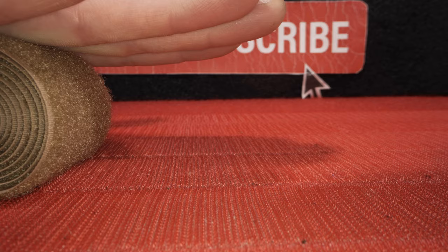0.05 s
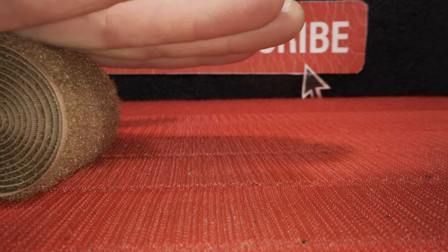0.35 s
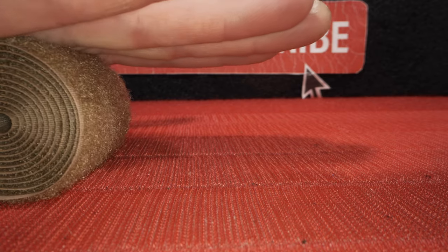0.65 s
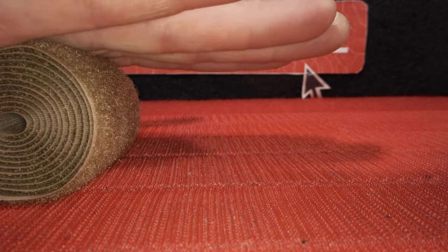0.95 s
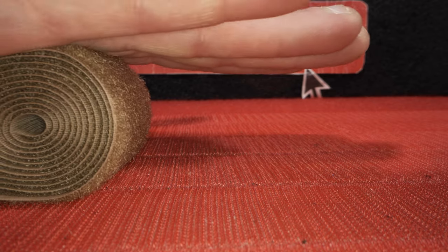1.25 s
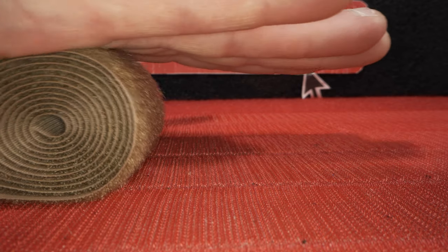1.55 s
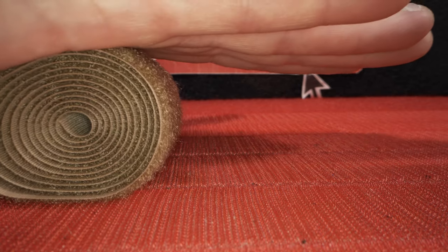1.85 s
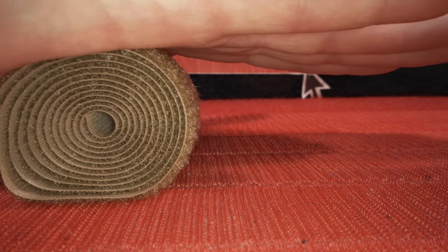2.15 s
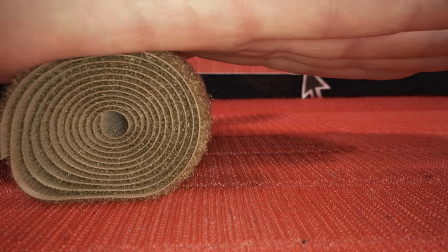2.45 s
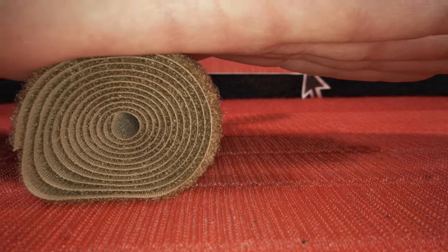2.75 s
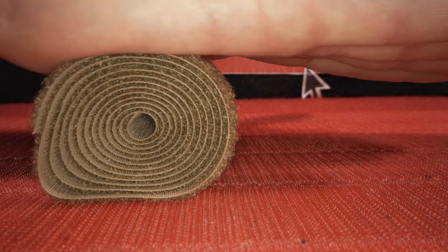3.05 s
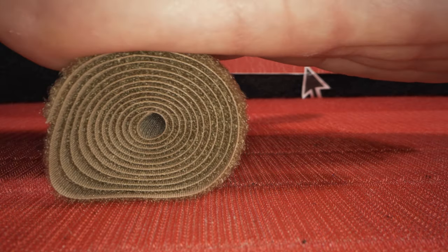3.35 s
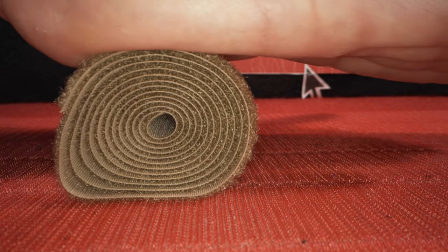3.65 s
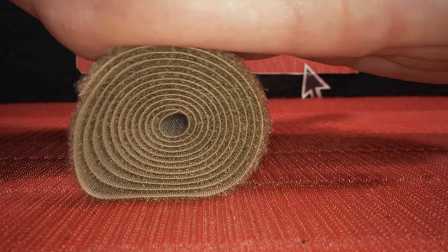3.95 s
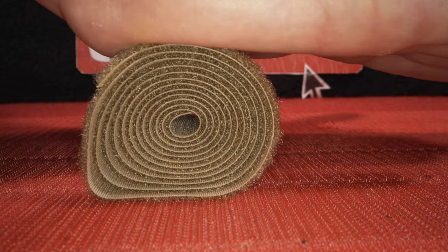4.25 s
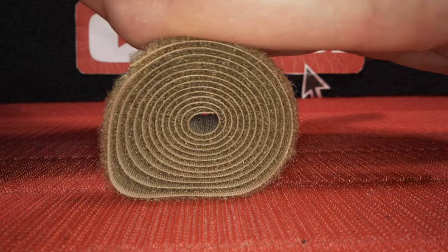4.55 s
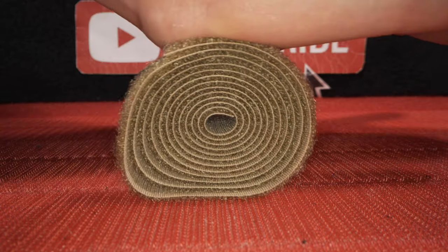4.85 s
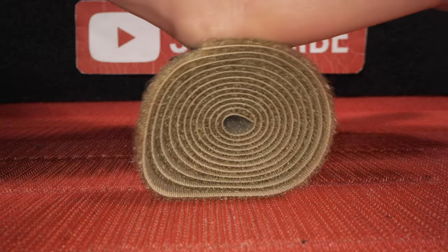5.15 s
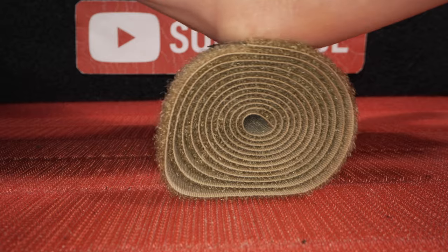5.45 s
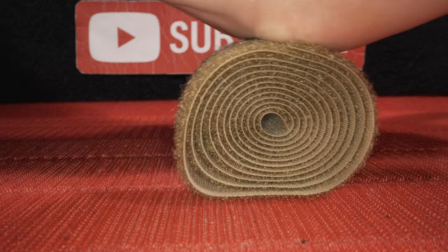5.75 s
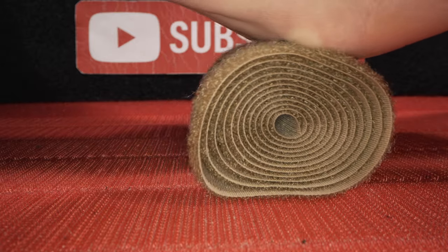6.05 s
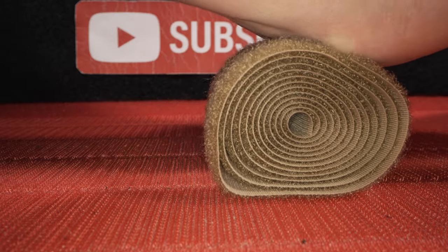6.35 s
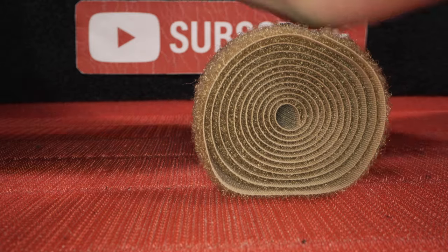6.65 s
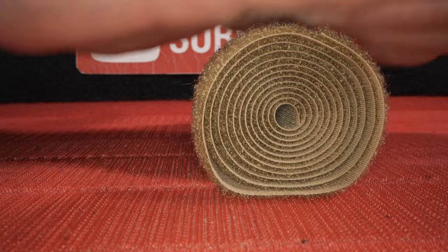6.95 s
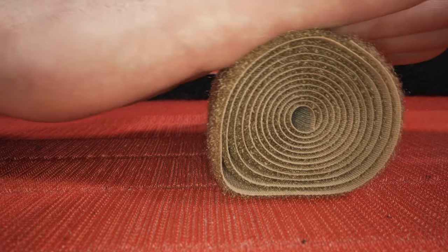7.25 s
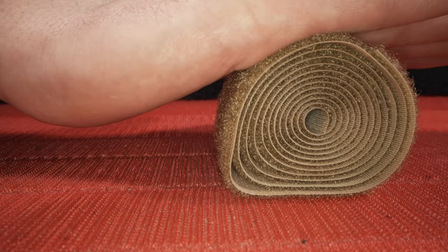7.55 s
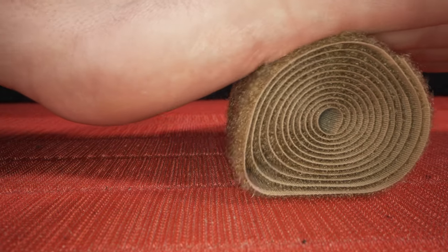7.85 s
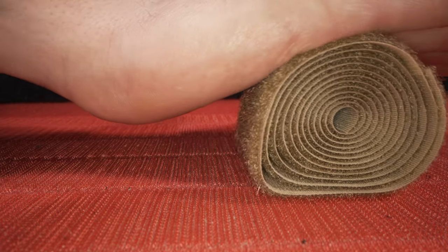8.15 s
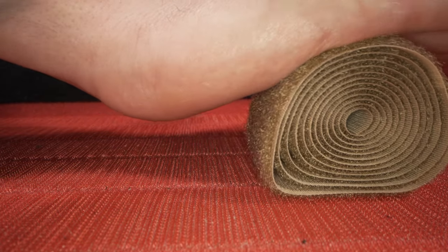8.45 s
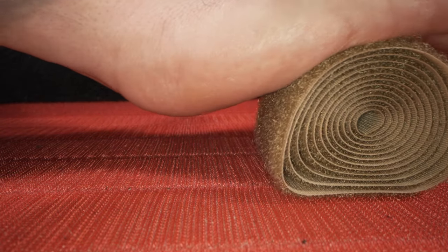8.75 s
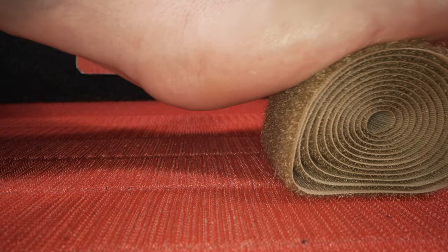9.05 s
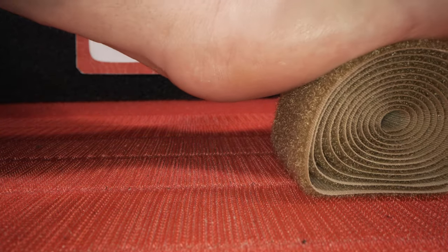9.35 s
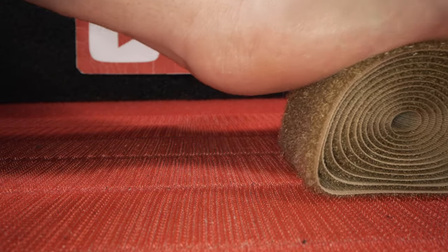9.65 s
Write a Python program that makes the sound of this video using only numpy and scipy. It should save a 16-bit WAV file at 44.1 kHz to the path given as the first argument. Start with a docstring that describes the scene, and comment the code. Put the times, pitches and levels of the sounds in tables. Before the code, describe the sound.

Close, crisp ripping and snapping of hook-and-loop tape rolled over a mat, drifting left to right with one short stop.

```python
"""Crackling rips and single snaps travel from left to right, close to a stereo microphone, as a hand
rolls hook-and-loop tape over a matching mat. At the trailing edge the loops store elastic energy
and release it as they slip off their hooks, singly or in avalanches; each snap flicks the backing
into vibration. The hand rumbles through the table and stops once to take a new grip.
A small dry room answers."""
import sys
import numpy as np
from scipy import signal
from scipy.fft import rfft, irfft
from scipy.io import wavfile

SR = 44100
rng = np.random.default_rng(int(sys.argv[2]) if len(sys.argv) > 2 else 0)


def log_audio(samples):
    """Write samples as a 16-bit WAV file to the path given in sys.argv[1]."""
    # one column per channel
    frames = np.atleast_2d(samples).T
    # limit to full scale, then quantise
    limited = np.clip(frames, -1, 1)
    pcm = np.round(limited * 32767).astype(np.int16)
    wavfile.write(sys.argv[1], SR, pcm)


N = 436590
TIME = np.arange(N) / SR

# snaps that stand out, alone in a lull or loud above a rip: t/s, energy/dB
SINGLE_SNAPS = [(0.134, -38.5), (0.2, 0.5), (0.207, 1.5), (0.257, -3.5), (0.507, -0.5), (0.565, 2.5),
                (0.717, -5), (0.805, 5.5), (0.927, -9.5), (0.99, -23), (1.069, 3.5), (1.099, 2),
                (1.118, 5.5), (1.134, 0.5), (1.173, 5), (1.512, -0.5), (1.646, -6.5), (1.655, -8),
                (1.703, -4.5), (1.776, -7), (2.028, -3.5), (2.101, -7), (2.174, -3.5), (2.378, -4.5),
                (2.605, -3.5), (2.64, -8.5), (2.679, -3.5), (2.719, -2), (2.768, -8.5), (2.838, 0),
                (2.849, -9.5), (2.853, -2), (2.861, 1.5), (2.955, -4.5), (3.029, 2.5), (3.05, -1),
                (3.053, 1), (3.063, -3), (3.198, -31), (3.348, 3.5), (3.431, -26), (3.482, -4),
                (3.503, -4.5), (3.527, -7), (3.552, -0.5), (3.838, -2.0), (3.887, 2.5), (3.98, 7.5),
                (4.001, 7.5), (4.067, 0), (4.218, -4), (4.259, 3.5), (4.345, 8.5), (4.369, 8), (4.514, 8),
                (4.523, 2.5), (4.621, 9.5), (4.744, 2), (4.817, 5.5), (4.876, 5), (5.114, 7.5), (5.14, 8.5),
                (5.183, 9.5), (5.223, 7.5), (5.318, 5.5), (5.361, 7), (5.423, -8), (5.472, 0.5), (5.622, 2),
                (5.677, 9), (5.707, 7), (5.761, 3), (5.935, -6.5), (5.945, -4.5), (6.016, -6), (6.071, 7),
                (6.078, 7), (6.172, 6.5), (6.883, -48.0), (7.276, -44), (7.393, -18), (7.402, -6),
                (7.482, 1), (7.488, 2.5), (7.632, -6.5), (7.64, -6.5), (7.782, 3.5), (7.792, 1.5),
                (7.834, 0), (7.845, 0), (7.887, 6), (7.963, 3), (8.1, 4.5), (8.115, 3), (8.122, 6.5),
                (8.238, 2.5), (8.361, 0.5), (8.401, 7), (8.431, 6), (8.454, 4), (8.664, 3.5), (8.727, 7),
                (8.835, -5.5), (9.015, 4.5), (9.02, 4.5), (9.083, 7), (9.145, 7), (9.213, 5.5),
                (9.235, -11), (9.255, 3), (9.346, 3.5), (9.452, -12.5), (9.468, -6), (9.528, -6.5),
                (9.628, 0), (9.8, -2), (9.897, 5.5)]
# stretches of tape that peel in one go: start/s, duration/s, nominal snap rate/Hz, mean energy/dB
PEELS = [(0.16, 0.063, 115, -4), (0.35, 0.04, 155, -3), (0.448, 0.16, 100, -2.5), (0.645, 0.016, 110, -4.5),
         (0.768, 0.073, 70, -3), (0.876, 0.029, 105, -4), (1.042, 0.16, 99.4, -1.5), (1.293, 0.02, 95, -2),
         (1.364, 0.017, 115, -6.5), (1.407, 0.12, 127, -4.0), (1.544, 0.071, 114, -4),
         (1.683, 0.033, 62.7, -5.5), (1.868, 0.054, 125, -7), (1.95, 0.052, 106.7, -8.5),
         (2.063, 0.056, 69.5, -2.5), (2.238, 0.024, 80, -8.0), (2.301, 0.04, 80, -6.5),
         (2.407, 0.029, 70, -10), (2.462, 0.091, 75, -5), (2.891, 0.081, 85.7, -0.5),
         (2.994, 0.026, 151, -3), (3.094, 0.024, 80, -4.5), (3.278, 0.11, 70.4, -1), (3.585, 0.03, 165, 0),
         (3.646, 0.1, 80, -3.5), (3.78, 0.033, 120, -5), (3.857, 0.16, 117.7, -0.5),
         (4.313, 0.096, 105.3, 2.5), (4.46, 0.039, 162, 0.5), (4.543, 0.091, 100, -0.5),
         (4.662, 0.02, 121, -4.5), (4.773, 0.063, 77, -3), (4.863, 0.075, 123, -1.5),
         (4.961, 0.25, 129.7, -2), (5.262, 0.027, 110, -2), (5.309, 0.13, 115, 1.5), (5.504, 0.031, 70, -3),
         (5.572, 0.059, 150.5, -0.5), (5.654, 0.07, 105, 0), (5.747, 0.022, 140, 1),
         (5.806, 0.084, 78.4, -1), (5.972, 0.016, 129, -0.5), (6.045, 0.068, 100, -1.5),
         (6.149, 0.12, 115, -1.0), (6.297, 0.022, 130, -2.5), (6.362, 0.059, 114.4, -4.5),
         (6.591, 0.059, 130, -36), (7.455, 0.1, 100, -3.5), (7.698, 0.11, 98.6, -2),
         (7.868, 0.082, 99.6, -2.5), (8.009, 0.063, 60, -2.0), (8.106, 0.11, 75.3, -1.5),
         (8.242, 0.05, 77.3, -3), (8.396, 0.15, 102.6, -4.5), (8.599, 0.025, 110, 0.5), (8.691, 0.1, 75, 1),
         (8.915, 0.033, 80, -2), (8.982, 0.056, 110, 0), (9.062, 0.062, 80, 1.5), (9.17, 0.032, 154, -1.5),
         (9.293, 0.057, 123, -1), (9.391, 0.031, 95, -4), (9.574, 0.094, 129.4, -1),
         (9.686, 0.068, 209, -2.5), (9.777, 0.069, 100.6, 0.5)]
# lag of the left capsule behind the right as the roll travels: t/s, lag/s
LEFT_LAG = [(0, 1.7e-4), (1.6, 1.35e-4), (2.1, 8.6e-5), (3.3, 7.5e-5), (4.2, 5.5e-5), (4.85, 5e-6),
            (5.4, -3e-6), (6.3, -2.2e-5), (7.6, -6.5e-5), (9.9, -1.15e-4)]
# how the roll lies on the mat: t/s, body gain/dB, crispness gain/dB, left minus right/dB
ROLL_CONTACT = [(0.2, -0.9, 1.5, 3), (1.2, -5.5, -1.5, 4), (1.75, 4.5, 7, 2.5), (2.3, 2, 8.5, 3),
                (3.2, -1.5, 1.5, 2), (4.2, -0.6, -1, 0.5), (5.2, 0, -2.5, 0), (5.7, 0.5, -0.5, 1.5),
                (6.3, 1.5, 4, 1), (7.5, -1, 2, -1), (8.1, -3.5, 0.5, -1), (8.7, -5.5, -3.5, -1.5),
                (9.2, -2.5, 0, -2), (9.8, -2.5, -0.5, -3)]
# modes of the taut backing and the mat: f/Hz, bandwidth/Hz, gain/dB
BACKING_MODES = [(304, 18, -6), (423, 150, -4.5), (660, 55, -1.5), (784, 66, -16.5), (847, 110, -4.5),
                 (1300.4, 45, -12), (1663, 98, -4.5)]
# colour of a snap with the roll at the left, middle and right: f/Hz, left gain/dB, right gain/dB
SPECTRUM_LEFT = [(49.7, -12.5, 0.5), (128, 8, 10), (300, 9, 9.5), (437, 5.5, 5.5), (744, 10, 13),
                 (1080, 10, 12.5), (1650, 7, 8), (2150, 6, 2.5), (2580, 2, 0.5), (4348.2, 4, 2.5),
                 (6280, 6, -3), (8500, -4.5, -4), (12600, -4, -3), (16000, -18.5, -17.5)]
SPECTRUM_MIDDLE = [(49.2, -26, -7), (131.3, 5.5, 0.5), (300, 5.5, -14.5), (447, 9, 1.9), (769.1, 6, 1.5),
                   (1170, 3, 2), (1576.5, 4, 6.5), (1950, -0.5, 2.4), (2890, -2, 2.5), (4300, -6.5, 1.9),
                   (6300, -2, 7), (8500, 0.3, 5.5), (12300, -0.5, 4.3), (16000, -23.5, -10.5)]
SPECTRUM_RIGHT = [(49.3, 2.5, -26), (120.02, 10.5, 7.5), (300, 11, 9), (455.8, 9, 5.5), (714.4, 6.5, 4),
                  (1070, 9, 6.5), (1680, 3, 5.5), (2199.7, -5, 5), (3282.5, -4.5, 8.5), (4800, 0, 3.5),
                  (6260, -0.5, 6.5), (8350, -3.5, 3.5), (13090, -1, 1), (16400, -16.5, -14)]
# when the roll is at these three places: t/s
PLACE_TIMES = [0.66, 6.24, 8.0]
# the hooks sing where the heel of the hand squeezes the roll: t/s, resonance gain/dB
HOOK_SQUEEZE = [(4.2, -10), (5.7, -6), (6.4, -4), (7.5, -11.5), (9.9, -14)]
# the hand's weight on the table: t/s, rumble level/dB
HAND_PRESSURE = [(0, -74), (1.6, -63.5), (2.3, -78), (3.4, -78), (4.0, -63.5), (4.5, -71.5), (5.4, -66.5),
                 (5.9, -63), (6.5, -82.5), (7.05, -75.5), (7.35, -79), (7.8, -62), (8.1, -66), (8.6, -81),
                 (9.3, -71), (9.9, -66)]
# the palm brushes off the loops and settles again: t/s, level/dB
PALM_BRUSH = [(6.45, -81.5), (6.54, -78.5), (6.61, -60.5), (6.645, -73.5), (6.69, -87.5), (6.97, -96.5),
              (7.01, -85), (7.06, -97), (7.3, -90.5), (7.38, -93)]
# reflections from nearby surfaces: delay/s, level/dB
EARLY_ECHOES = [(0.011, -56.5), (0.033, -41.5)]
# reverberant tail: lower f/Hz, upper f/Hz, T60/s, level/dB
ROOM_TAIL = [(69.17, 395, 0.11, -8), (500, 5800, 0.22, -24.5), (1980, 3130, 0.09, -14),
             (5844, 11000, 0.6, -43)]
# quiet air of the room: f/Hz, relative spectral density/dB
AIR_SPECTRUM = [(12, -25.5), (20, 2.5), (30, -8), (38, -22.5), (81, -31), (301, -28), (446, -34.5),
                (1260, -59.5), (8410, -44.5), (16000, -54)]


def releases(reload_s=.003, scatter_db=4.5, swell_db=1.5, slack_db=0.5, break_db=1.0, max_snaps=64):
    """Stick-slip: each loop takes the load, holds a random time and lets go. Rows: t/s, energy/dB."""
    rows = [np.array(SINGLE_SNAPS)]
    draws = rng.standard_normal((len(PEELS), 3, max_snaps))
    for (start, length, rate, mean_db), (a, b, strength) in zip(PEELS, draws):
        count = int(np.clip(round(length * rate) + 1, 2, max_snaps))
        hold = ((a ** 2 + b ** 2) / 2)[:count]  # exponential, mean 1
        elapsed = np.cumsum(reload_s + max(1 / rate - reload_s, 0) * hold)
        progress = (elapsed - elapsed[0]) / (elapsed[-1] - elapsed[0])
        snap_db = scatter_db * np.minimum(strength[:count], 1)  # a loop bears only so much tension
        # the pull is hardest in mid-rip and slackens over a long hold
        snap_db += swell_db * np.sin(np.pi * progress) - slack_db * hold
        snap_db[0] = break_db  # the rip starts when a firm loop gives way
        snap_db -= 10 * np.log10(np.mean(undb(snap_db) ** 2))
        rows.append(np.column_stack([start + length * progress, mean_db + snap_db]))
    rows = np.concatenate(rows)
    return rows[np.argsort(rows[:, 0])]


def clicks(times, db, thin, hook_hz, hook_db, flutter_db, flutter_s, size=192):
    """Impulse excitation: a pulse, a hook's damped ring and fabric flutter; thin (0-1) cuts the bass."""
    count = len(times)
    t = np.arange(size) / SR
    pitch, ring, across, balance, sharp = rng.standard_normal((count, 5)).T[:, :, None]
    hz = np.clip(hook_hz * np.exp(.4 * pitch), 3000, 15000)
    hook = unit(np.diff(np.exp(-t * hz) * np.sin(2 * np.pi * hz * t)))
    pulse = (t[:-1] == 0) + undb(hook_db + 2 * ring) * hook
    shared, own = (rng.standard_normal((count, channels, size)) for channels in (1, 2))
    flutter = (shared + 1.63 * own) * (np.exp(-t / flutter_s) + 0.33 * np.exp(-t / 0.0026))
    flutter = unit(band(flutter, 600, 18000, order=1))[:, :, 1:]
    wave = pulse[:, None] + undb(flutter_db) * flutter
    wave += (undb(3.5 * sharp[:, None]) - 1) * (wave - lowpass(wave, 6000))  # dull or sharp slips
    wave = unit(wave - thin[:, None, None] * lowpass(wave, 2500))
    # the hooks lie all across the tape, so each reaches the capsules with its own lag and balance
    lag_s = curve(LEFT_LAG, times)[0][:, None] + 8e-6 * across
    pan_db = curve(ROLL_CONTACT, times)[2][:, None] + 1.5 * balance
    side, lead_s = np.array([.5, -.5]), .001
    delay_s = (lead_s + lag_s * side)[:, :, None]
    phase_shift = np.exp(-2j * np.pi * np.fft.rfftfreq(2 * size, 1 / SR) * delay_s)
    wave = irfft(rfft(wave, 2 * size) * phase_shift) * undb(db[:, None] + pan_db * side)[:, :, None]
    start = np.round((times - lead_s) * SR).astype(int)
    index = np.clip(start[:, None] + np.arange(2 * size), 0, N)
    return np.array([np.bincount(index.ravel(), wave[:, c].ravel(), N + 1)[:N] for c in range(2)])


def ripping(snaps, crowd_s=.006, tear_db=-1.0, tear_span_db=12.0, lone_db=-22.5, avalanche_db=11.0,
            scatter_db=4.5, spread_s=.0012, count=9):
    """Avalanche: each snap takes weaker loops with it, louder where snaps are strong or crowded."""
    times, db = snaps.T
    crowding = np.exp(-abs(times[:, None] - times) / crowd_s).sum(axis=1) - 1
    avalanche = np.clip(.7 * crowding + (db - tear_db) / tear_span_db, 0, 1)[:, None]
    # neighbours only follow the first snap after a lull; inside an avalanche they also run ahead
    jitter = rng.standard_normal((len(times), count))
    after_lull = (np.diff(times, prepend=0) > .008)[:, None]
    offset_s = spread_s * np.where(after_lull, abs(jitter), jitter) * (.7 + .7 * avalanche)
    # the stored energy is divided between the main loop and its neighbours
    share_db = lone_db + avalanche_db * avalanche + scatter_db * rng.standard_normal(jitter.shape)
    main_db = db - 10 * np.log10(1 + np.sum(undb(share_db) ** 2, axis=1))
    thin = np.interp(db, [-30, -14], [1, .2])  # a faint snap is too weak to lift the backing
    strong = clicks(times, main_db, thin, hook_hz=7900, hook_db=-6.5, flutter_db=-1, flutter_s=0.00045)
    weak_times = (times[:, None] + offset_s).ravel()
    weak_db = (main_db[:, None] + share_db).ravel()
    weak = clicks(weak_times, weak_db, np.repeat(np.maximum(thin, .35), count),
                  hook_hz=5500, hook_db=-9.0, flutter_db=3.5, flutter_s=0.00019)
    return strong + lowpass(weak, 11000)  # weaker loops let go more softly


def fibres(snaps, db=-32.5, scatter_db=9.0, trail_s=.013, count=6):
    """Elastic recoil: freed loops spring back and tick softly against the hooks after each snap."""
    times, snap_db = np.repeat(snaps, count, axis=0).T
    late_s = trail_s * rng.rayleigh(size=len(times))
    tick_db = snap_db + db + scatter_db * np.minimum(rng.standard_normal(len(times)), 2)
    ticks = clicks(times + late_s, tick_db, thin=np.full(len(times), .8),
                   hook_hz=4480, hook_db=1.5, flutter_db=1.0, flutter_s=.0008)
    return lowpass(ticks, 6400)


def backing(x, body_hz=1300, crisp_hz=8500, db=-3.0, thump_hz=95, rest_db=-67):
    """Forced vibration: snaps ring the tape and mat; the roll shades one capsule, then the other."""
    body_db, crisp_db, _ = curve(ROLL_CONTACT, TIME)
    body, crisp = lowpass(x, body_hz), x - lowpass(x, crisp_hz)
    x = x + (undb(body_db) - 1) * body + (undb(crisp_db) - 1) * crisp
    thump_db = curve(HAND_PRESSURE, TIME)[0] - rest_db  # under a harder press, snaps thump the table
    x = x + (undb(thump_db) - 1) * lowpass(x, thump_hz)
    x = x + sum(undb(gain_db) * resonance(x, hz, width) for hz, width, gain_db in BACKING_MODES)
    fades = [np.interp(TIME, PLACE_TIMES, place) for place in np.eye(len(PLACE_TIMES))]
    spectra = SPECTRUM_LEFT, SPECTRUM_MIDDLE, SPECTRUM_RIGHT
    return undb(db) * sum(convolve(x * fade, colour(points)) for fade, points in zip(fades, spectra))


def singing_hooks(tape):
    """Resonance: squeezed hooks ring in a narrow treble band."""
    return undb(curve(HOOK_SQUEEZE, TIME)[0]) * resonance(tape, hz=6680, width_hz=210)


def capsules(x, turn_hz=1500):
    """Phase difference: the two capsules agree in the bass and fall out of phase towards the treble."""
    left, right = x
    return np.array([left, 2 * lowpass(right, turn_hz) - right])


def hand(grain_db=5.5, grain_samples=64):
    """Structure-borne sound and friction: the hand rumbles through the table and rustles on the loops."""
    rumble = noise(17, 68) * undb(curve(HAND_PRESSURE, TIME)[0])
    rumble = rumble - 0.51 * rumble[::-1]  # the table rocks the capsules against each other
    grain = undb(grain_db * np.repeat(rng.standard_normal(N // grain_samples + 1), grain_samples)[:N])
    rustle = (undb(-5.5) * noise(2400, 5100) + noise(3600, 13000)) * grain
    rub = undb(-5) * noise(55, 250) + undb(-11.5) * noise(500, 1800)
    return rumble + (rustle + rub) * undb(curve(PALM_BRUSH, TIME)[0])


def room(x, smear_s=0.00067, onset_s=0.0019, size=16384):
    """Reverberation: two smeared early reflections and a short tail decaying exponentially by band."""
    t = np.arange(size) / SR
    response = np.zeros((2, size))
    for delay_s, db in EARLY_ECHOES:
        response += undb(db) * unit(rng.standard_normal((2, size)) * np.exp(-abs(t - delay_s) / smear_s))
    for lo_hz, hi_hz, t60, db in ROOM_TAIL:
        envelope = np.exp(-np.log(1000) * t / t60) * (1 - np.exp(-t / onset_s))
        tail = band(rng.standard_normal((2, size)), lo_hz, hi_hz) * envelope
        response += undb(db) * unit(tail) * np.sqrt(2 * (hi_hz - lo_hz) / SR)
    return convolve(x + x[::-1], response) / np.sqrt(2)


def air(db=-84):
    """Partial coherence: faint steady room noise, mostly shared by both capsules."""
    x = convolve(rng.standard_normal(N) + 0.64 * rng.standard_normal((2, N)), colour(AIR_SPECTRUM)[0])
    return x * undb(db) / np.std(band(x, 100, 16000))


def undb(db):
    """Amplitude ratio of a level."""
    return 10 ** (np.asarray(db) / 20)


def curve(table, t):
    """Linear interpolation of a table's columns at times t."""
    knots, *columns = np.transpose(table)
    return [np.interp(t, knots, column) for column in columns]


def unit(x):
    """Normalisation of each row to unit energy."""
    return x / np.sqrt(np.sum(x ** 2, axis=-1, keepdims=True))


def band(x, lo_hz, hi_hz, order=2):
    """Band-pass filter."""
    sections = signal.butter(order, [lo_hz, min(hi_hz, .45 * SR)], "band", fs=SR, output="sos")
    return signal.sosfilt(sections, x)


def lowpass(x, hz):
    """One-pole low-pass filter."""
    return signal.sosfilt(signal.butter(1, hz, fs=SR, output="sos"), x)


def resonance(x, hz, width_hz):
    """One damped mode, gain 1 at its centre."""
    return signal.lfilter(*signal.iirpeak(hz, hz / width_hz, fs=SR), x)


def convolve(x, response):
    """Convolution of each channel with an impulse response."""
    return signal.oaconvolve(x, np.atleast_2d(response), axes=-1)[:, :N]


def colour(points, size=4096):
    """Minimum-phase impulse responses, one for each dB column of a spectrum."""
    hz, *columns = np.transpose(points)
    log_hz = np.log(np.maximum(np.fft.rfftfreq(size, 1 / SR), 1))
    cepstrum = irfft(np.log([undb(np.interp(log_hz, np.log(hz), column)) for column in columns]))
    cepstrum[:, 1:size // 2] *= 2
    cepstrum[:, size // 2 + 1:] = 0
    return irfft(np.exp(rfft(cepstrum)))


def noise(lo_hz, hi_hz):
    """Band noise of rms 1, uncorrelated left and right."""
    return unit(band(rng.standard_normal((2, N)), lo_hz, hi_hz)) * np.sqrt(N)


def scene():
    """Superposition of the ripping tape, its reverberation, the hand and the air."""
    snaps = releases()
    tape = -backing(ripping(snaps) + fibres(snaps))  # the backing springs away: pressure drops first
    tape = tape + singing_hooks(tape)
    tape = tape - 2 * resonance(tape, hz=10500, width_hz=7000)  # all-pass: the treble rings briefly
    return capsules(tape) + room(tape) + hand() + air()


def record(dry, top_hz=16700):
    """Clipping at full scale, then band limiting by a steep low-pass."""
    return signal.sosfilt(signal.ellip(10, .1, 70, top_hz, fs=SR, output="sos"), np.clip(dry, -1, 1))


dry = scene()
out = record(dry)
log_audio(out)
```